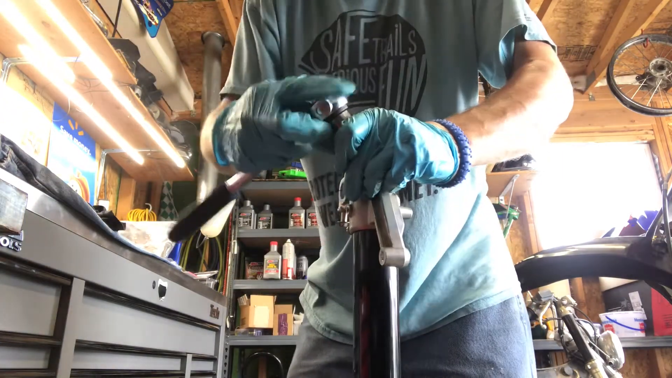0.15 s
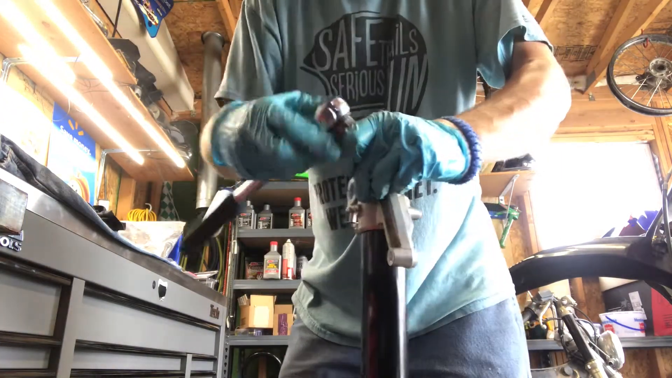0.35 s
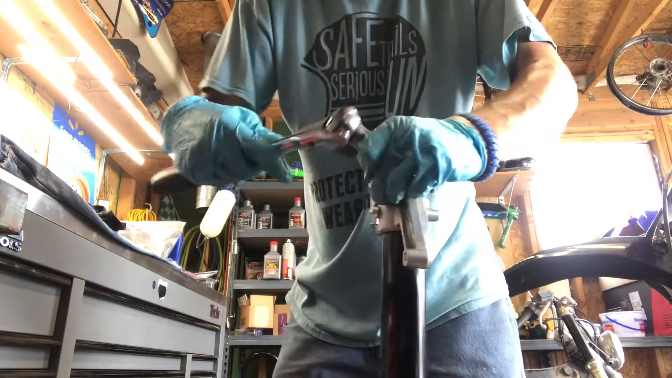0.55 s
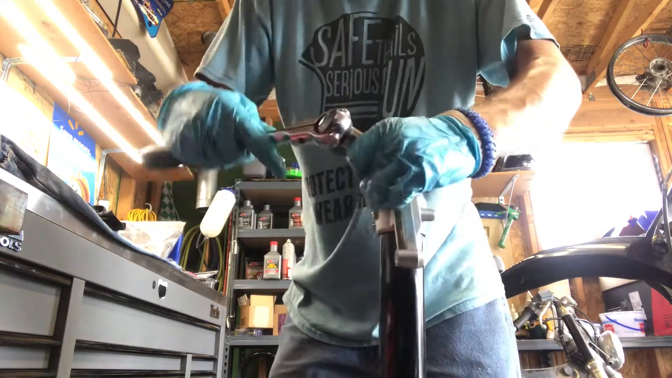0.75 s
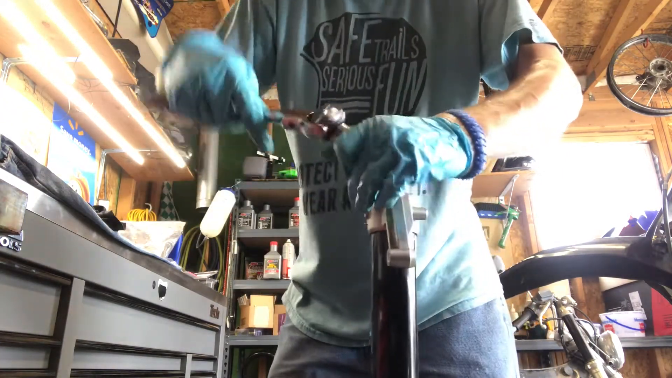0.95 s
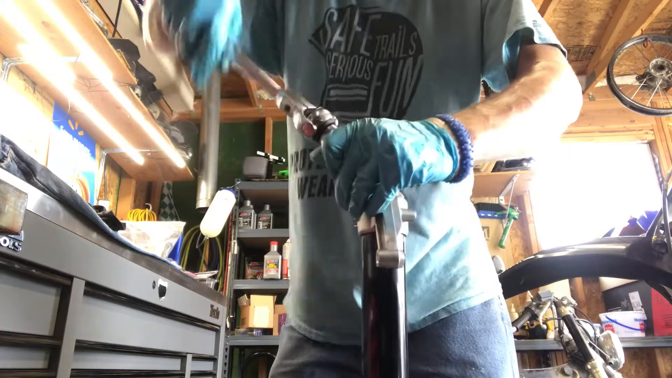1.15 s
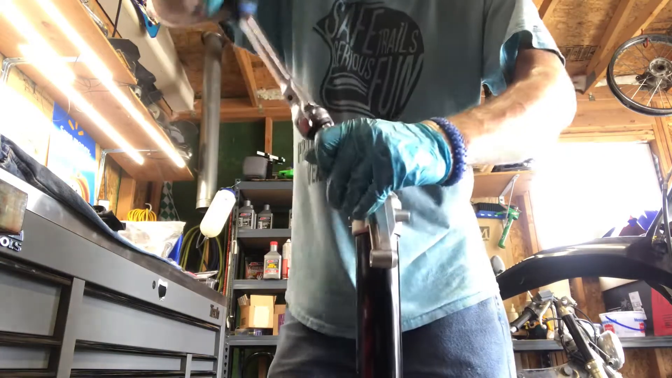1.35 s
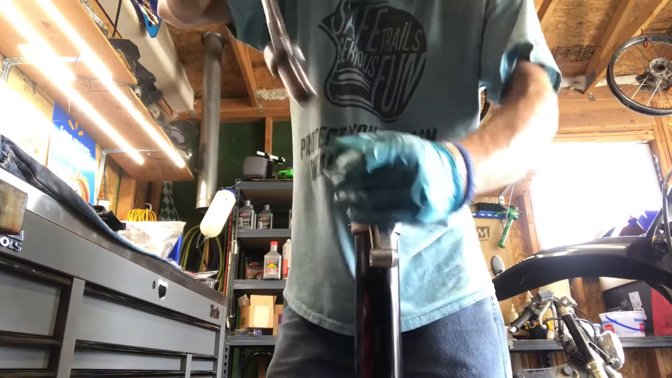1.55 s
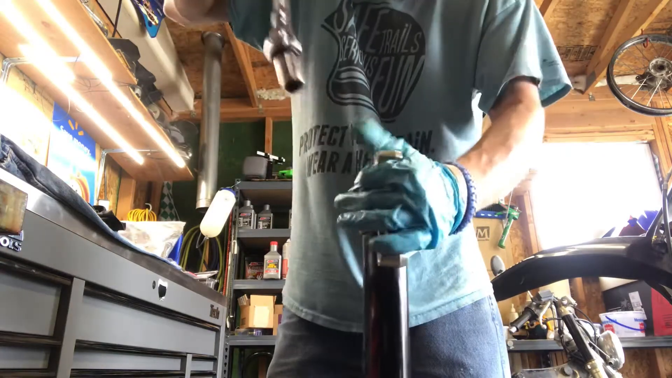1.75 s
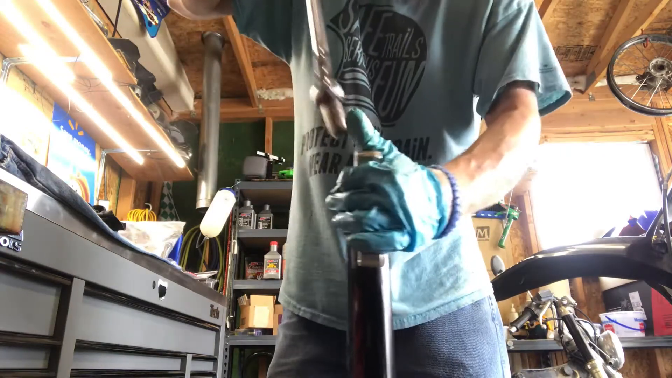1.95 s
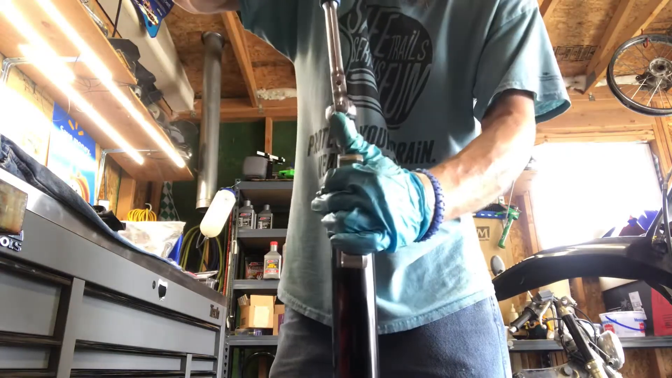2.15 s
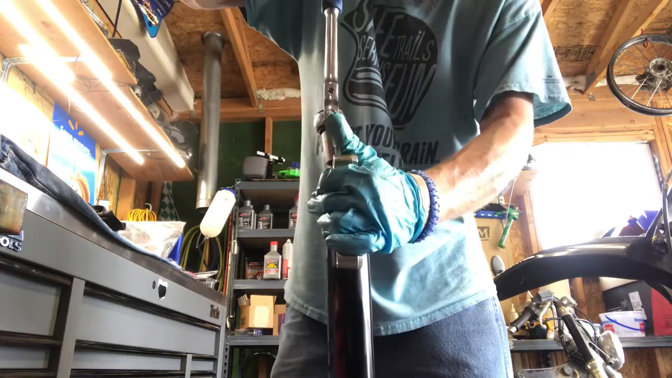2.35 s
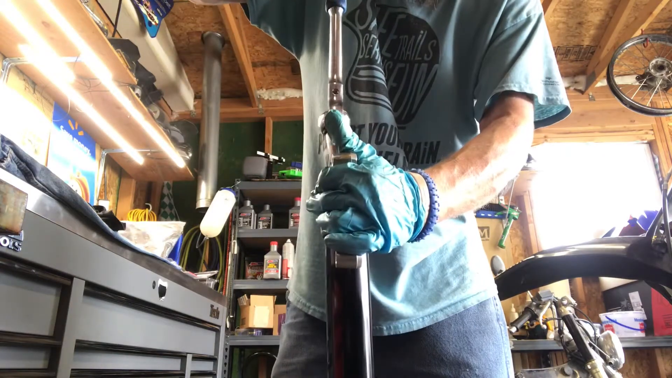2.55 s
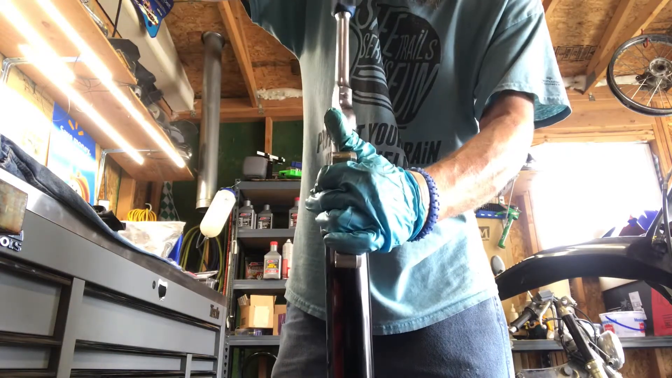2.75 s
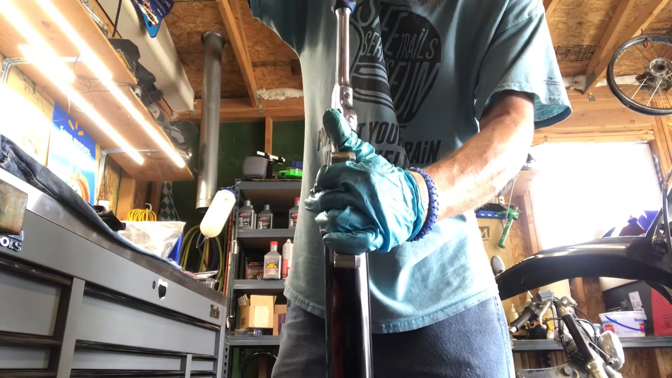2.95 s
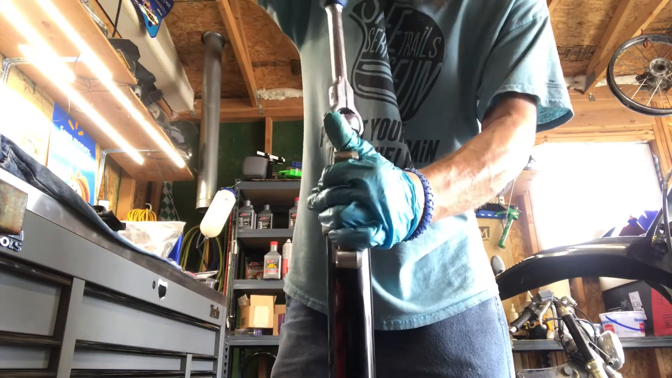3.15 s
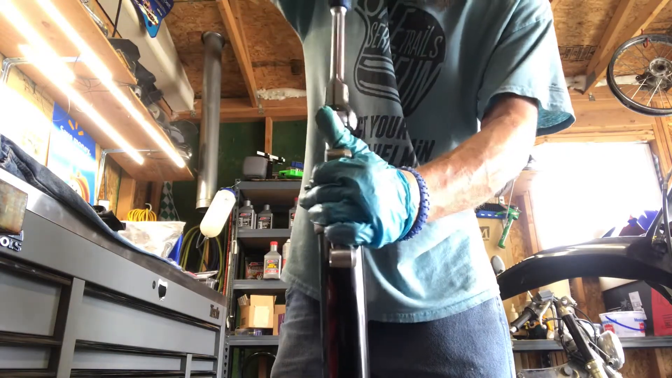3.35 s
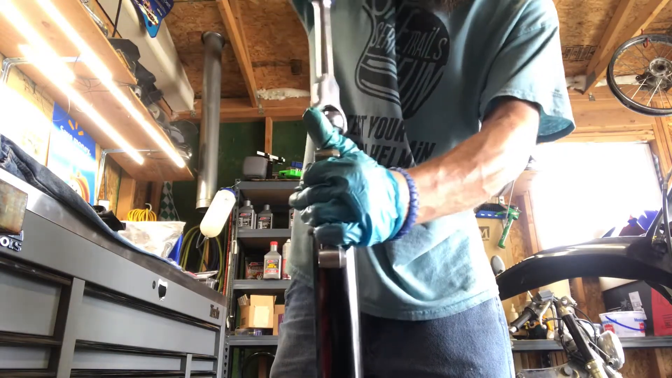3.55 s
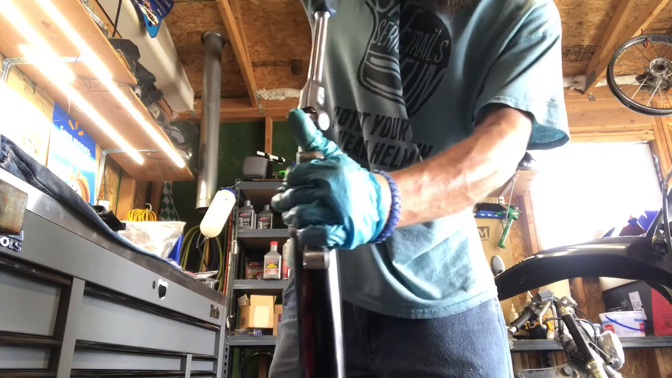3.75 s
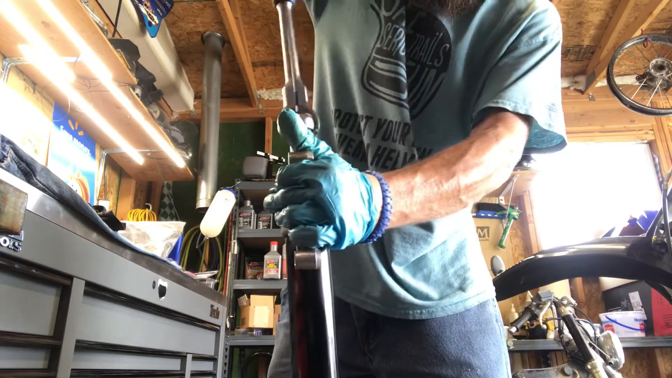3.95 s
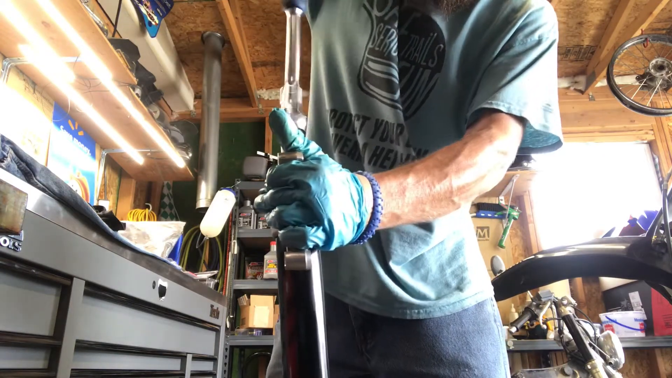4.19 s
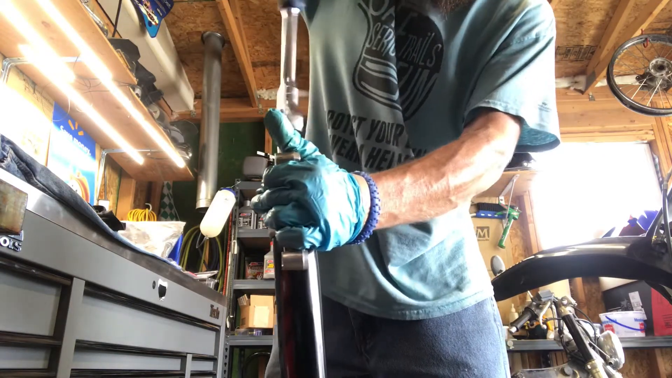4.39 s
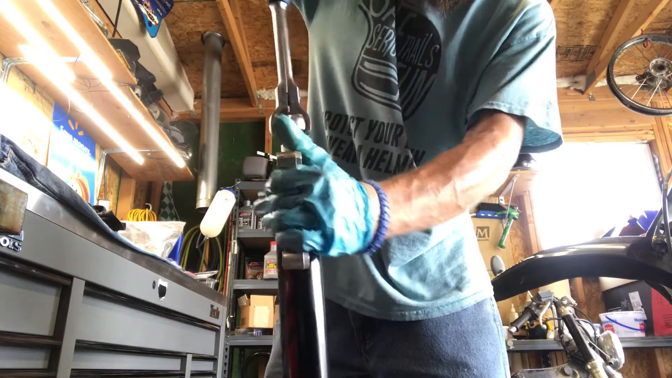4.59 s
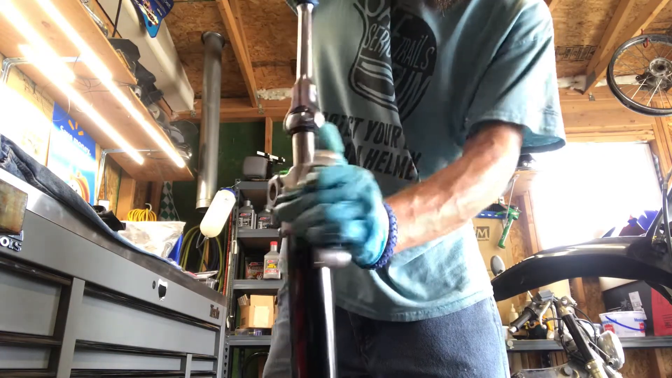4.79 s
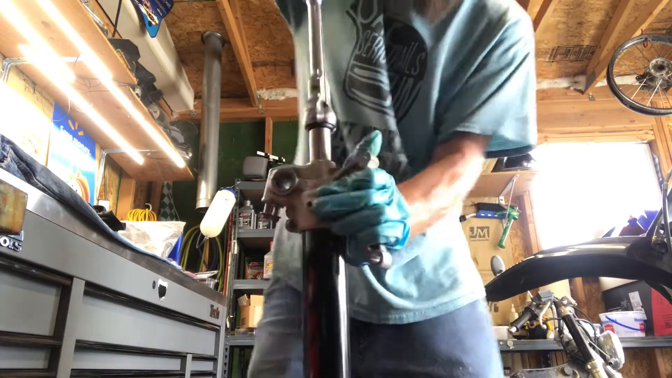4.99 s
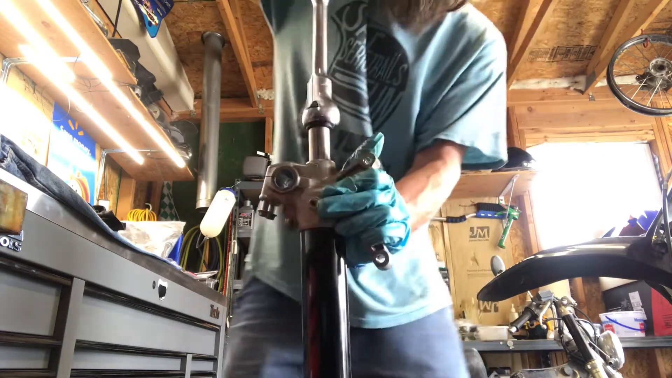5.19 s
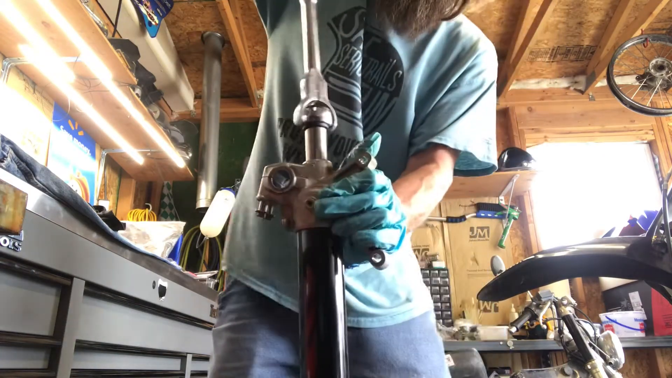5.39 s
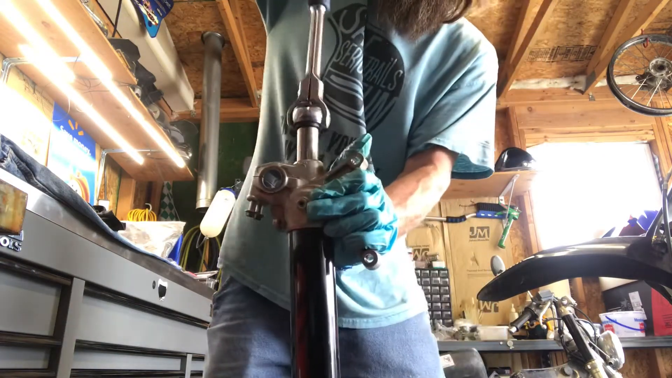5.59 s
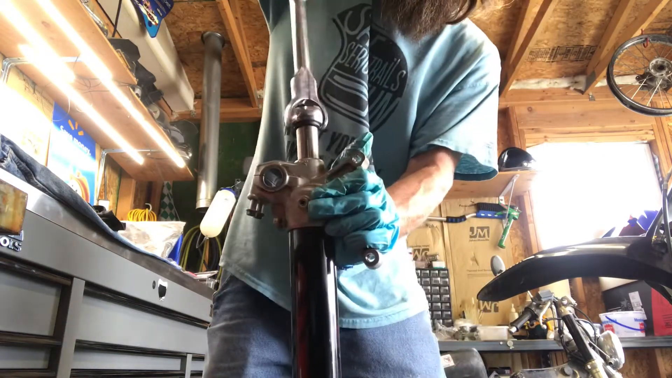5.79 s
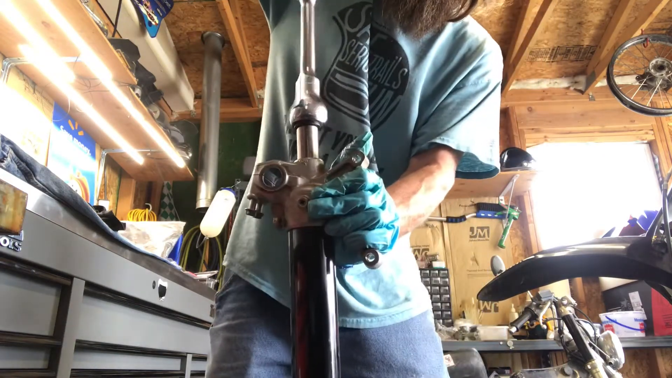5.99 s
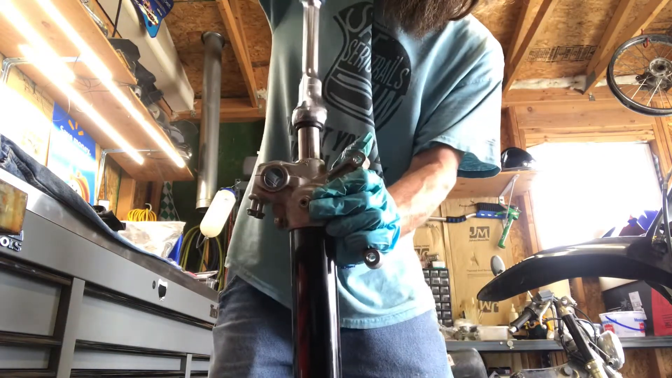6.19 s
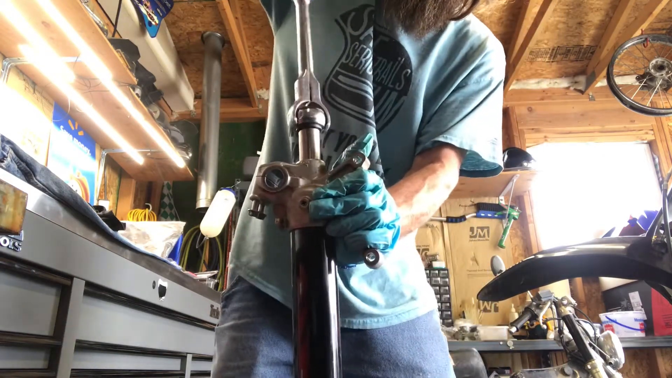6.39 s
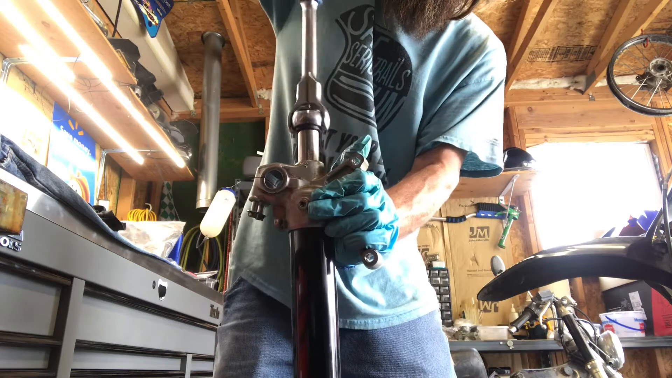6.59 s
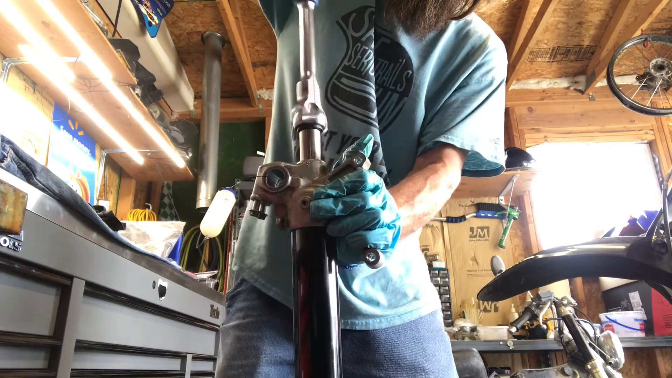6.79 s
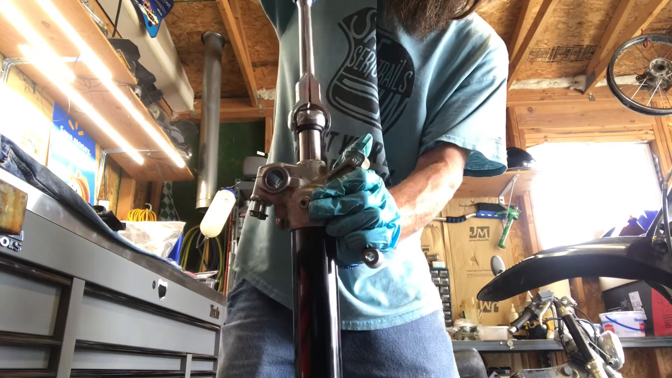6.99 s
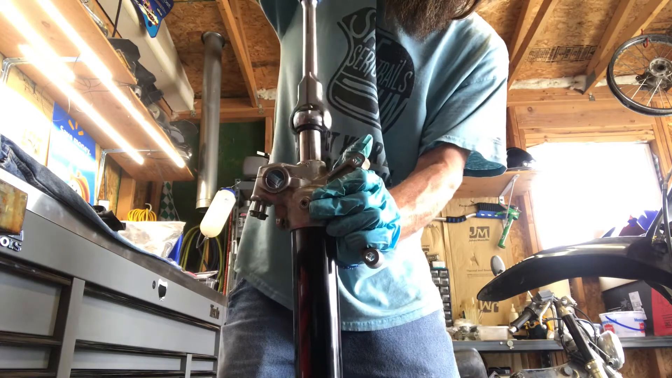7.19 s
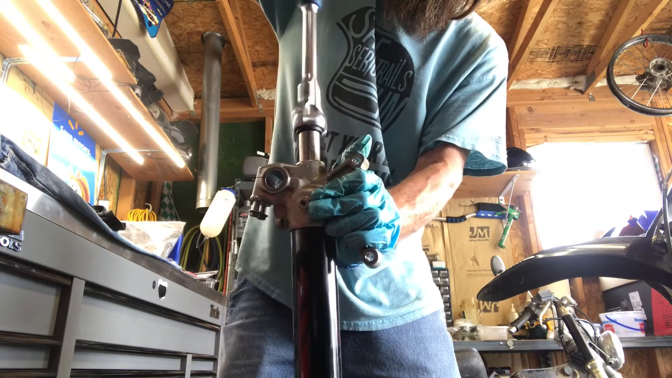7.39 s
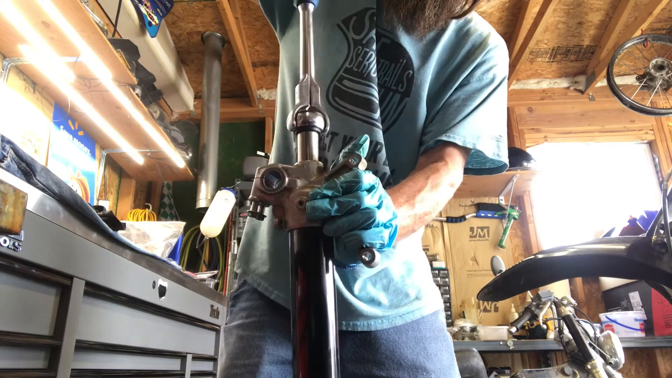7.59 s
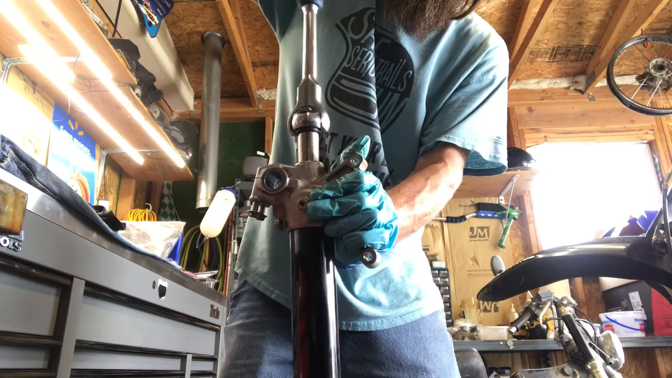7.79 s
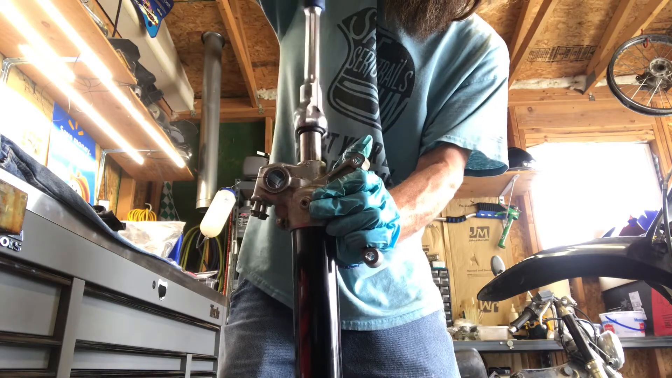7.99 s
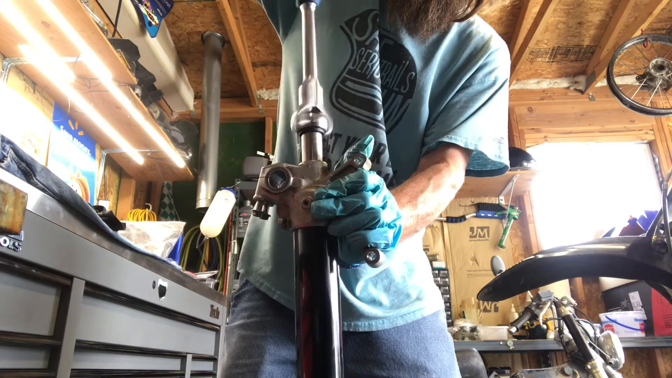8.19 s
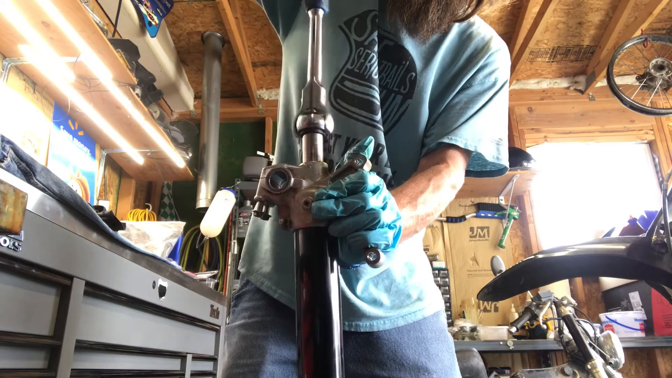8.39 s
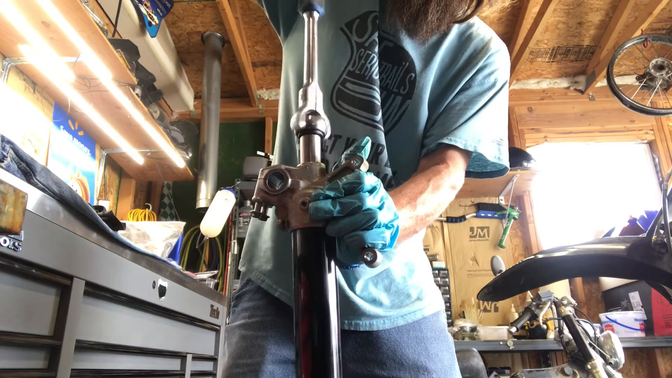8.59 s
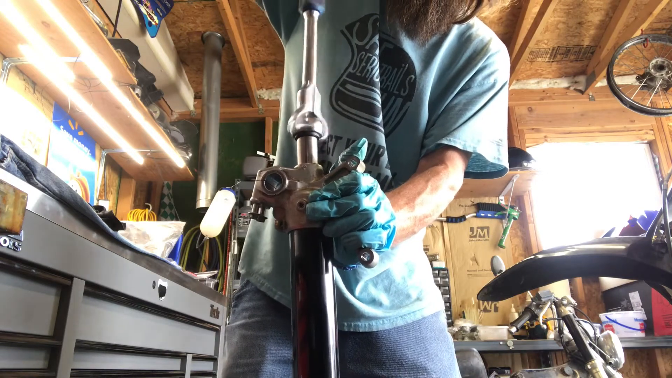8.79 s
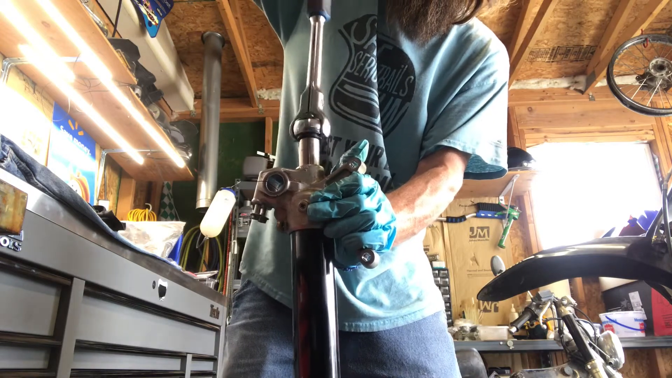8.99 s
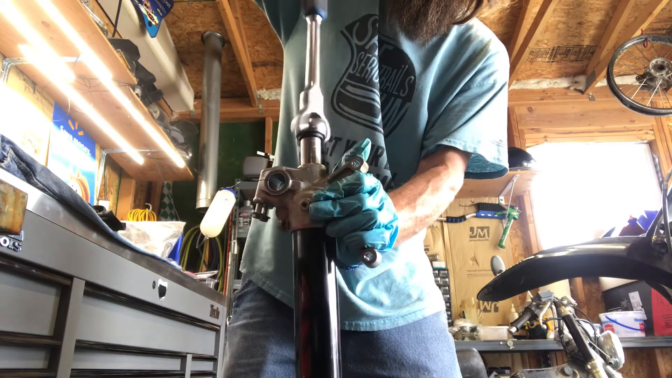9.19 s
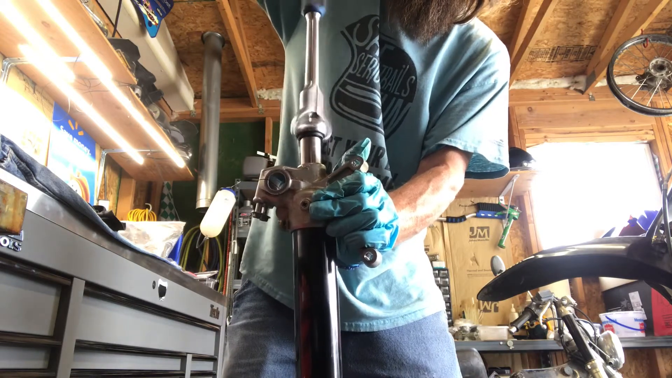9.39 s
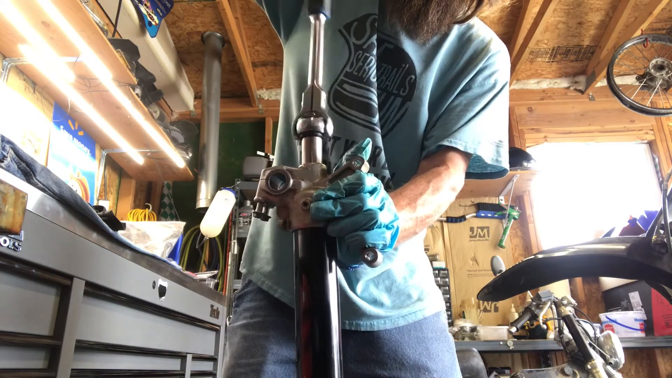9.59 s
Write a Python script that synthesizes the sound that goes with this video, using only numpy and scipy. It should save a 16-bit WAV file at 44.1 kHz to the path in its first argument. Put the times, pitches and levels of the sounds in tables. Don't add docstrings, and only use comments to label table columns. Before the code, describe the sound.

Gloved hands rustle and steel thuds as a socket seats, followed by steady zipping ratchet strokes about three per second over a low hum.

```python
import sys
import numpy as np
from scipy import signal
from scipy.fft import rfft, irfft
from scipy.io import wavfile
from scipy.ndimage import uniform_filter1d

SR = 44100
rng = np.random.default_rng(int(sys.argv[2]) if len(sys.argv) > 2 else 0)


def boost(x):
    u = np.asarray(x, float) / 20
    return 10 ** u


def master(y):
    cut = np.clip(np.atleast_2d(y).T, -1, 1)
    pcm = np.round(cut * 32767)
    wavfile.write(sys.argv[1], SR, pcm.astype(np.int16))


N = 425565

# (frequency [Hz], level [dB per Hz])
HUM = [(15, -51), (25, -18), (43, -6), (59, 4.5), (86, -6.5), (123, -2), (146, -8), (194, -9), (300, -12),
       (390, -41), (660, -120)]
AIR = [(180, -23.5), (300, -3.5), (430, -10), (800, -9.5), (1400, -10), (2400, -14.5), (4400, -16),
       (5000, -23.5), (8000, -29.5), (10500, -31.5), (15700, -34.5), (16000, -72.5)]
HUM_DB, AIR_DB = -59.5, -63.5
DRONE_HZ, DRONE_DB = 58.5, -65

# (delay [s], level [dB])
ECHOES = [(.0037, -8.5), (.0065, -13.5), (0.0097, -18.5), (0.0146, -14.5)]
# (frequency [Hz], tail level [dB], time to fade by 60 dB [s])
GARAGE = [(500, -14, 0.058), (1490, -6.5, 0.17), (3000, -5, 0.17), (6100, -4.5, 0.19), (9600, -4, 0.14),
          (12000, -5.5, 0.14), (14200, -11, 0.13)]
ECHO_SPREAD = 0.3

# (frequency [Hz], level [dB])
CLOTH = [(1500, -14), (3000, -1.5), (6000, -1.5), (9000, -3), (10500, -9), (13000, -6), (15700, -7),
         (16000, -40)]
THREAD = [(200, -7.5), (450, -1), (900, -0.5), (1400, -2.5), (2500, -5), (5000, -12), (9000, -44)]
# (time [s], level [dB])
HANDS = [(0.0, -79), (0.32, -68.5), (0.8, -75.5), (0.89, -92), (0.92, -68), (1.0, -74), (1.09, -61),
         (1.25, -64.5), (1.48, -67.5), (1.68, -58), (1.77, -66), (1.86, -74), (2.05, -84), (2.4, -95),
         (2.83, -62), (3.03, -74), (4.98, -65), (5.2, -88)]
RUB_DB, RUB_FOLLOWS_HANDS = -67, 0.21
DRAG_CLOTH_DB, DRAG_THREAD_DB, DRAG_RISE_S, DRAG_EASE_DB_PER_S = -65.5, -56, 0.1, 41
SLIPS_PER_TURN, SLIP_SPAN_S, SLIP_DB, SLIP_SCATTER_DB = 7, 0.2, -47, 2

# (time [s], energy [dB])
RATTLES = [(2.9429, -22), (2.9694, -33), (3.0243, -35), (3.0604, -34), (3.2223, -33.5), (3.4728, -23),
           (3.6085, -38), (3.8359, -26), (3.8719, -26), (3.9193, -26), (3.9338, -25), (3.9604, -35.5),
           (4.2519, -30), (4.2646, -30.5), (4.5555, -32.5), (4.5861, -27.5), (4.8351, -26.5), (4.9092, -35),
           (4.9477, -33), (4.9672, -32.5), (5.0206, -29), (5.0464, -36.5), (5.2659, -27.5), (5.3074, -29),
           (5.3917, -25), (5.628, -30), (5.6986, -21), (5.7378, -21), (6.0611, -32.5), (6.32, -18),
           (6.3866, -26), (6.4076, -28), (6.6094, -22), (6.639, -20), (6.6883, -19), (6.7061, -28),
           (6.7515, -16), (6.8896, -20), (6.9607, -38), (6.9941, -37), (7.5579, -31), (7.8274, -23),
           (7.871, -22), (7.9165, -36), (8.2188, -35), (8.2767, -30), (8.4431, -26), (8.4768, -32),
           (8.5194, -42), (8.7852, -30), (8.8339, -43), (8.8749, -33), (9.0798, -25), (9.3361, -29),
           (9.4688, -35),
           (2.555, -32), (2.565, -26), (2.639, -25), (2.753, -20), (2.768, -19), (3.644, -23), (3.809, -26),
        (3.82, -17), (4.004, -15), (5.296, -13), (5.39, -26), (3.858, -20), (3.893, -27), (4.076, -16.5),
        (4.106, -18), (4.193, -22), (4.307, -27), (4.331, -15), (4.488, -25), (5.335, -20.5), (5.352, -31),
        (5.402, -30), (5.474, -13.5), (5.544, -14), (5.657, -22), (5.722, -23), (5.801, -14), (6.138, -15),
        (6.153, -17.5), (6.235, -16.5), (6.46, -14.5), (6.91, -25), (7.06, -22.5), (7.36, -19.5),
        (7.584, -30.5), (7.597, -37), (7.648, -24), (7.808, -22), (7.948, -28), (7.991, -16), (8.591, -30),
        (8.646, -9.5), (8.746, -24), (8.929, -13.5), (9.106, -25), (9.116, -31), (9.18, -27), (9.552, -12),
        (0.1165, -24.5)]
RATTLE_DB = -4.5

# (time [s], thud energy [dB], tick energy [dB], tick pitch [Hz])
SEATING = [
    (0.908, -28, -34, 3370),
    (0.936, -44.0, -32, 3480),
    (1.254, -33, -33, 3700),
    (1.7106, -33.5, -50, 5140),
    (2.4033, -29, -46, 2900),
    (2.551, -37, -38.5, 8550),
    (2.597, -27, -53, 3000),
    (2.6188, -19, -24, 4040),
    (2.6265, -33, -36, 12200),
    (2.7411, -15.5, -20, 6300),
]
# (time [s], thud [dB], tick [dB], tick pitch [Hz])
TURN_BACK = [(3.2517, -16.5, -15, 3470), (3.641, -22.5, -28, 3700), (3.983, -18.5, -9.5, 7500),
             (4.3145, -17, -13, 7600), (4.607, -37, -31, 3417), (4.6487, -25, -14.5, 7600),
             (5.1264, -16, -25.5, 12300), (5.4477, -27, -24.5, 4400), (5.7514, -23.5, -23.5, 9900),
             (5.7882, -26, -22.5, 8000), (6.4167, -23, -33, 5300), (6.4363, -23.5, -51, 3800),
             (6.7284, -21, -25.5, 9900), (7.3491, -30, -46, 2890), (8.5834, -39, -50, 3930),
             (8.8862, -26, -44, 2795)]
# (time [s], thud [dB], tick [dB], tick pitch [Hz])
BITES = [(3.4295, -19, -36, 3420), (3.815, -20, -33, 6100), (4.1646, -21.5, -26, 2820),
         (4.478, -30, -22, 5670), (5.2944, -14, -21, 2750), (5.619, -19.5, -38, 6640),
         (5.9803, -10.5, -28, 2913), (6.3005, -13.5, -31, 2800), (6.603, -18, -33, 7260),
         (6.917, -15, -39, 2926), (7.213, -16, -29, 8100), (7.5384, -31, -25, 12200),
         (7.8076, -21, -30, 7290), (8.139, -19.5, -37, 3704), (8.7447, -20.5, -60, 2799),
         (9.0442, -30, -39.0, 5806)]
# (time [s], thud [dB], tick [dB], tick pitch [Hz])
ROCKING = [(3.467, -24.5, -31, 3700), (3.495, -18, -22.5, 3000), (3.528, -25.5, -43, 5300),
           (3.8558, -17, -31, 3930), (3.8922, -33, -33, 5300), (4.1891, -16.5, -28, 3399),
           (4.2272, -20, -47, 2800), (4.515, -22, -38, 4005), (5.3214, -20, -20, 3397),
           (5.422, -31, -35, 5300), (5.6573, -25, -33.5, 4020), (5.674, -16, -20.5, 9900),
           (6.3465, -20.5, -30.5, 9900), (6.3723, -20, -46, 2800), (7.5831, -40, -47, 3000),
           (7.8575, -18.5, -20, 5300), (6.641, -27, -34, 3000), (7.29, -36, -46, 3000),
           (6.055, -30, -47, 3000), (8.7992, -27.0, -24, 9900), (9.0988, -28, -24.5, 9900),
           (9.3972, -35, -24, 9900)]
# (time [s], energy [dB], pitch [Hz], 60 dB fade
# [s])
THUMPS = [(0.37, -27.5, 1786, 0.61), (2.556, -22, 924, .04), (0.05, -30, 716, .9), (0.62, -33, 714, .9),
          (2.62, -33, 6300, .25), (2.626, -31, 7400, 0.049), (2.742, -22, 590, 0.042),
          (2.938, -23, 110, .05), (4.268, -18.5, 554, 0.06), (3.885, -29, 1904, .08),
          (4.235, -30, 1900, .06), (4.485, -32, 282.2, .05), (4.995, -20.5, 210, 0.074),
          (5.748, -21, 99.5, 0.054), (6.905, -26.5, 269, 0.057)]

# (frequency [Hz], level [dB], time to fade by 60 dB [s])
SOCKET = [(3880, -5.5, .03), (5300, -6, 0.06), (7400, -9.5, 0.03), (9900, -13, 0.06)]
HOLLOW = [(289, -1.6, 0.024), (546, 0, .02), (770, -1.4, 0.013)]
PART_HELD = [(713, -5.5, 0.018), (937, -4.5, 0.033), (1175, -7.5, 0.016), (1600, 3.5, 0.039),
             (1810, 1, 0.025), (2094, 0, 0.02), (2445, -2.5, 0.02)]
PART = [(703, -2.5, 0.015), (930, 2, 0.064), (1152, 1, 0.015), (1399, 3.5, 0.03), (1627, -6, 0.025),
        (1874, -12, 0.03), (2402, -9.5, 0.02), (2670, -7.5, 0.013)]
FRAME = [(3800, -2.5, 0.022), (4600, -19, .03), (9050, -0.5, 0.024), (9280, -0.5, .03),
         (10880, -9.5, 0.039), (11600, -5, .02), (12120, 6.5, 0.017)]
HEAD = [(6300, -6.5, 0.035), (6640, -3.5, 0.03), (6804, -2.5, 0.03), (6965, 3, 0.02), (7175, -1, 0.022),
        (6020, -11.5, 0.023)]
PAWL = [(13816, 2.5, 0.0091), (13200, -9, 0.005), (12250, -9, 0.0079)]
PAWL_UPPER = [(14120, -1, 0.011), (14200, -1, 0.0098), (14470, -14, 0.0067), (15450, -10.5, 0.0039)]
# (frequency [Hz], level [dB])
CRACK = [(500, -11), (1000, -0.5), (2000, 3), (4000, -1.5), (5400, -3.5), (8000, -3.5), (12000, -3.5),
         (15500, -17.5), (17000, -40.5)]
PAWL_BAND = [(11000, -11.5), (12800, -3.5), (13700, 1), (14300, 2.4), (15000, 0), (15600, -4.5),
             (16200, -22.5)]
REGRIP_S, REGRIP_DB, HELD_DB = 5.0, 2, -2.5

# (time [s], pawl [dB], head [dB], frame [dB], part [dB])
TEETH = [(0.1162, 9.5, -11.5, -11.5, -13), (0.1267, -1, -24, -37, -37), (0.1724, -6.5, -20.5, -19.5, -30),
         (0.3123, 1, -15, -19, -21), (0.3678, 2, -14, -16, -19), (0.6156, 1.5, -14, -17, -27),
         (0.6404, 0, -19, -19, -32), (0.679, 1.5, -15, -17, -23), (2.7762, 5.5, -9, -19, -19),
         (2.79, 5.5, -9.5, -35, -19), (2.8008, 1, -14, -19.5, -19), (2.8138, 0, -18, -22.5, -25),
         (2.8904, -1.5, -43, -22, -20.5)]
# (start [s], length [s], tilt to the pawl's upper tones [dB], head [dB], part [dB])
STROKES = [(3.273, 0.095, -3, -34.5, -38), (3.666, 0.088, -2, -35.5, -38), (4.006, 0.092, -1, -41, -38.5),
           (4.334, 0.09, 2, -31.5, -37.5), (4.662, 0.11, 0.5, -39, -37), (5.131, .1, -2, -42, -39),
           (5.476, 0.087, 3.5, -29, -40), (5.801, 0.11, -1, -35, -40), (6.1415, 0.108, 3, -35, -39.5),
           (6.461, .1, 0.5, -30, -39.5), (6.761, 0.1, -3, -38.5, -41.5), (7.0692, 0.097, 0.5, -35, -42.5),
           (7.367, 0.095, -4, -31.5, -41), (7.659, .108, 3, -34.5, -40), (7.952, 0.12, -1.5, -33.5, -42),
           (8.292, .11, -4, -31.5, -40), (8.598, 0.096, -1, -34.5, -42), (8.899, 0.098, 0.5, -34, -40.5),
           (9.188, 0.098, -0.5, -30, -40.5), (9.484, 0.12, -0.5, -38.5, -42.5)]
# (time [s], level [dB])
PRESSURE = [
    [(3.277, -25), (3.345, -19), (3.367, -26)],
    [(3.671, -27), (3.695, -22), (3.743, -21.5), (3.753, -27)],
    [(4.01, -25), (4.026, -18), (4.074, -19), (4.099, -29.5)],
    [(4.339, -25.5), (4.357, -17.5), (4.405, -21), (4.424, -26)],
    [(4.666, -27.5), (4.704, -19), (4.722, -29), (4.756, -15.5), (4.772, -26)],
    [(5.135, -21.5), (5.145, -21.5), (5.171, -25), (5.189, -18.5), (5.227, -26), (5.231, -21)],
    [(5.48, -23.5), (5.486, -16.5), (5.542, -18.5), (5.561, -28)],
    [(5.807, -31), (5.811, -24), (5.883, -19.5), (5.889, -35), (5.897, -21.5), (5.913, -22.5)],
    [(6.146, -24), (6.164, -17), (6.242, -24.5)],
    [(6.466, -18), (6.506, -22), (6.526, -18), (6.534, -17.5), (6.562, -24.5)],
    [(6.765, -24.5), (6.805, -22.5), (6.861, -21.5)],
    [(7.073, -26), (7.085, -21), (7.137, -18), (7.164, -23.5)],
    [(7.37, -18), (7.38, -14), (7.406, -27), (7.416, -18), (7.461, -23)],
    [(7.663, -30), (7.703, -19), (7.727, -23), (7.743, -18.5), (7.767, -29)],
    [(7.957, -33.5), (7.977, -26), (7.995, -34), (8.053, -23), (8.078, -26)],
    [(8.297, -22), (8.325, -20), (8.337, -30), (8.361, -15.5), (8.371, -19), (8.403, -23)],
    [(8.603, -28.5), (8.619, -20.5), (8.694, -20)],
    [(8.904, -25), (8.906, -25), (8.948, -21), (8.958, -19.5), (8.997, -28)],
    [(9.191, -28), (9.197, -22), (9.227, -26.5), (9.247, -16), (9.259, -11), (9.269, -22.5), (9.287, -14)],
    [(9.49, -32), (9.518, -25), (9.576, -20.5), (9.584, -19), (9.604, -28)],
]
# drop at stroke start [dB], drop at its end [dB],
# share of the pressure changes
START_DB = [-0.8, -3.5, -3, -4.5]
END_DB = [-3.5, -15, -7.5, -12]
PRESSURE_SHARE = [0.85, 0.34, 0.4, 0.28]
TEETH_HZ = 230
ATTACK_S, RELEASE_S = 0.018, 0.028
PAWL_LEADS_S, FRAME_DB, FOLLOWS_PAWL = 0.0046, -38, 0.16
SECOND_SWELL_S, SECOND_SWELL_DB, TILT_SCATTER_DB = 0.0037, -0.5, 0.5

# (frequency [Hz], level [dB])
MICROPHONE = [(380, 0), (450, -4), (540, 0.5), (4600, 0), (4880, -3), (5150, 1), (15500, 0), (16000, -11)]
LIMIT_DB, TOP_HZ, STARVED_HZ, EDGE_HZ = -10, 16550, 14900, 14500
STARVED_DB, RECOVER_S = -34, 0.03


def colour(x, points):
    hz, db = np.transpose(points)
    f = np.maximum(np.fft.rfftfreq(len(x), 1 / SR), 1)
    gain = boost(np.interp(np.log(f), np.log(hz), db))
    return irfft(rfft(x) * gain, len(x))


def unit(x):
    return x / np.sqrt(np.sum(x ** 2))


def noise(points, grain_db):
    grains = rng.standard_normal(N) * boost(grain_db * np.minimum(rng.exponential(size=N), 5))
    return unit(colour(grains, points)) * np.sqrt(N)


def walk(rate):
    k = int(SR / rate)
    steps = np.repeat(rng.standard_normal(N // k + 1), k)
    return 1.35 * uniform_filter1d(uniform_filter1d(steps, k), k)[:N]


def ring(modes, size=3000, longest=0.035):
    t = np.arange(size) / SR
    hz, db, t60 = np.transpose(modes)[:, :, None]
    t60 = np.minimum(t60, longest)
    sign = (-1) ** np.arange(len(hz))[:, None]
    fade = 1000 ** (-t / t60) / np.sqrt(t60)
    return unit(np.sum(sign * boost(db) * np.sin(2 * np.pi * hz * t) * fade, axis=0))


def crack(low_hz, high_hz):
    spike = np.zeros(1024)
    spike[64] = 1
    sos = signal.butter(2, [low_hz, high_hz], "bandpass", fs=SR, output="sos")
    return unit(signal.sosfilt(sos, colour(spike, CRACK)))


def blows(s, db, shape, same):
    chatter = rng.standard_normal((len(s) + 1, len(shape)))
    chatter = unit(shape) * (np.sqrt(same) * chatter[0] + np.sqrt(1 - same) * chatter[1:])
    at = (np.asarray(s) * SR).astype(int)[:, None] + np.arange(len(shape))
    return [np.bincount(at.ravel(), (boost(d)[:, None] * chatter).ravel(), N + SR)[:N] for d in db]


def struck(force, response):
    return signal.oaconvolve(force, response)[:N]


def pings(s, db, hz, t60):
    out = np.zeros(N + SR)
    for at, d, f, fade in np.broadcast((s * SR).astype(int), db, hz, t60):
        out[at:at + 9000] += boost(d) * ring([(f, 0, fade)], size=9000, longest=1)
    return out[:N]


def part_ring(force, longest):
    held = np.arange(N) / SR < REGRIP_S
    return (struck(force * held, boost(HELD_DB) * ring(PART_HELD, longest=longest))
            + struck(force * ~held, ring(PART, longest=longest)))


def hum():
    turns = np.cumsum(DRONE_HZ + 0.84 * walk(2.9)) / SR
    note = np.sin(2 * np.pi * turns) * boost(DRONE_DB + 1.5 * walk(5.2))
    rumble = noise(HUM, grain_db=0) * boost(HUM_DB + 0.38 * walk(1.6))
    return note + rumble + noise(AIR, grain_db=-0.5) * boost(AIR_DB)


def room():
    t = np.arange(SR // 2) / SR
    hz, db, t60 = np.transpose(GARAGE)
    response = np.zeros(len(t))
    response[0] = 1
    for s, echo_db in ECHOES:
        delay_s = s * (1 + ECHO_SPREAD * rng.uniform(-1, 1))
        response[int(delay_s * SR)] += boost(echo_db)
    diffuse = rfft(rng.standard_normal(len(t)))
    f = np.log(np.fft.rfftfreq(len(t), 1 / SR) + 1)
    build_up = np.minimum(t / 0.0018, 1)
    for k in range(len(hz)):
        band = irfft(diffuse * np.interp(f, np.log(hz), np.arange(len(hz)) == k), len(t))
        response += boost(db[k]) / 10 * band * 1000 ** (-t / t60[k]) * build_up
    return response / np.sqrt(2.5)


def rustle():
    t = np.arange(N) / SR
    hands_db = np.interp(t, *np.transpose(HANDS))
    since = t - np.array([[start + length] for start, length, *_ in STROKES])
    rise = np.clip(since / DRAG_RISE_S + 1, 0, 1)
    ease = boost(-DRAG_EASE_DB_PER_S * np.maximum(since, 0))
    drag = np.max(rise * ease, axis=0)
    cloth = noise(CLOTH, grain_db=2) * boost(1.5 * walk(20))
    thread = noise(THREAD, grain_db=3) * boost(3.5 * walk(60))
    rub_db = RUB_DB + RUB_FOLLOWS_HANDS * (hands_db + 73.5)
    return (cloth * np.hypot(boost(hands_db), drag * boost(DRAG_CLOTH_DB))
            + thread * np.hypot(boost(rub_db), drag * boost(DRAG_THREAD_DB)))


def slips():
    ends = np.array([[start + length] for start, length, *_ in STROKES[:-1]])
    chance = rng.random((len(ends), SLIPS_PER_TURN, 2))
    s = ends + SLIP_SPAN_S * chance[..., 0]
    db = SLIP_DB - SLIP_SCATTER_DB * np.log(0.08 + 1.04 * chance[..., 1])
    return s.ravel(), db.ravel()


def rattles():
    s, db = np.transpose(RATTLES)
    db = db + RATTLE_DB
    shape = np.exp(-np.arange(200) / SR / 0.0015)
    jolt, = blows(s, [db], shape, same=0)
    jolt = jolt + np.bincount((s * SR).astype(int), boost(db), N)
    return (boost(0.5) * part_ring(jolt, longest=0.022)
            + struck(jolt, boost(-3.5) * crack(300, 2000))
            + struck(jolt, boost(-12.0) * ring(HOLLOW)))


def knocks():
    s, thud_db, tick_db, tick_hz = np.transpose(SEATING + TURN_BACK + BITES + ROCKING)
    shape = np.exp(-np.arange(300) / SR / 0.002)
    thud, tick = blows(s, [thud_db, tick_db], shape, same=0)
    slip_s, slip_db = slips()
    thud = thud + blows(slip_s, [slip_db], shape, same=0)[0]
    dull = (boost(1.0) * part_ring(thud, longest=0.02)
            + struck(thud, boost(-12.0) * ring(HOLLOW))
            + struck(thud, boost(-3.0) * crack(210, 3000)))
    bright = (struck(tick, boost(-6.5) * ring(SOCKET, longest=0.11))
              + struck(tick, crack(1900, 9100))
              + pings(s, tick_db - 9.0, tick_hz, t60=0.025))
    return dull + bright + pings(*np.transpose(THUMPS))


def teeth():
    slow = np.array(TEETH) + [0, 0.3, -0.5, 7.0, 2.0]
    rows = [np.c_[slow, np.full(len(TEETH), -2.5)]]
    for (start, length, tilt_db, head_db, part_db), curve in zip(STROKES, PRESSURE):
        t = np.arange(0, length, 1 / SR)
        hz = TEETH_HZ * (0.55 + 0.45 * np.sin(np.pi * t / length))
        chance = rng.standard_normal((40, 3))
        count = np.arange(int(hz.sum() / SR) + 1)
        uneven = count + 0.12 * chance[count, 0] * (count > 0)
        at = np.interp(uneven, np.cumsum(hz) / SR, t)
        pressure_db = np.interp(start + at + PAWL_LEADS_S, *np.transpose(curve))
        pawl_db = pressure_db.mean()
        frame_db = FRAME_DB + FOLLOWS_PAWL * (pawl_db + 22)
        db = (np.c_[[pawl_db, head_db, frame_db, part_db]]
              + np.outer(START_DB, np.maximum(1 - at / ATTACK_S, 0))
              + np.outer(END_DB, np.maximum(1 - (length - at) / RELEASE_S, 0))
              + np.outer(PRESSURE_SHARE, pressure_db - pawl_db))
        share = 10 * np.log10(SR / np.interp(at, t, hz)) + 1.23 * chance[count, 1]
        tilt = tilt_db + TILT_SCATTER_DB * chance[count, 2]
        rows.append(np.vstack([start + at, db + share, tilt]).T + [0, -0.5, -3.0, 7.0, 3, -2.5])
    return np.concatenate(rows).T


def ratchet():
    s, pawl_db, *body_db, tilt_db = teeth()
    t = np.arange(400) / SR
    swell = np.where(t < 0.0022, 0.15 + (t / 0.0033) ** 2, np.exp(-(t - 0.0022) / 0.0003))
    swell = swell + boost(SECOND_SWELL_DB) * np.interp(t - SECOND_SWELL_S, t, swell, left=0)
    upper_db = pawl_db - 10 * np.log10(1 + boost(-2 * tilt_db))
    lower, upper = blows(s, [upper_db - tilt_db, upper_db], swell, same=0.2)
    jolt = np.exp(-t / 0.0057) + 0.5 * np.exp(-t / 0.0011)
    head, frame, part = blows(s, body_db, jolt, same=0.06)
    pawl_sound = colour(struck(lower, ring(PAWL)) - struck(upper, ring(PAWL_UPPER)), PAWL_BAND)
    frame_response = boost(-13.5) * ring(FRAME, size=1024, longest=0.012) + crack(2320, 16100)
    grip_db = REGRIP_DB * (np.arange(N) / SR > REGRIP_S) - 3.0
    return (pawl_sound * boost(3.5)
            + struck(head, ring(HEAD, longest=0.027))
            + struck(frame, frame_response)
            + boost(-2.0) * part_ring(part, longest=0.042) * boost(grip_db)
            + struck(part, crack(420, 3260)))


def scene():
    tool = ratchet() + knocks() + rattles()
    place = np.arange(N) / SR * 5.3
    sound = np.zeros(N)
    for k in range(8):
        near = np.clip((place - k + 4) % 8 - 4, -1, 1)
        path = np.maximum(np.cos(np.pi * near / 2), 0)
        sound = sound + struck(tool * path, room())
    return (sound / np.sqrt(1.7) + rustle() + hum())[None]


def band_limit(x):
    return signal.sosfilt(signal.butter(12, 16640, fs=SR, output="sos"), x)


def record(dry):
    power = uniform_filter1d(dry ** 2, size=48)
    dry = dry / (1 + (power / boost(2 * LIMIT_DB)) ** 2) ** 0.125
    low_pass = signal.ellip(8, 0.2, 70, TOP_HZ, fs=SR, output="sos")
    cut = signal.sosfilt(low_pass, colour(dry[0], MICROPHONE))
    top = colour(cut, [(STARVED_HZ - 100, -80), (STARVED_HZ + 100, 0)])
    edge = colour(cut, [(EDGE_HZ - 60, -80), (EDGE_HZ + 60, 0)]) - top
    top = top + edge * np.clip(0.7 + walk(12), 0, 1)
    keep = np.exp(-1 / (RECOVER_S * SR))
    loudness = signal.lfilter([1 - keep], [1, -keep], np.roll(cut, 450) ** 2)
    lost = 1 / (1 + (boost(2 * STARVED_DB) / (loudness + 1e-12)) ** 2)
    return band_limit((cut - 0.985 * lost * top)[None])


dry = scene()
out = record(dry)
master(out)
```